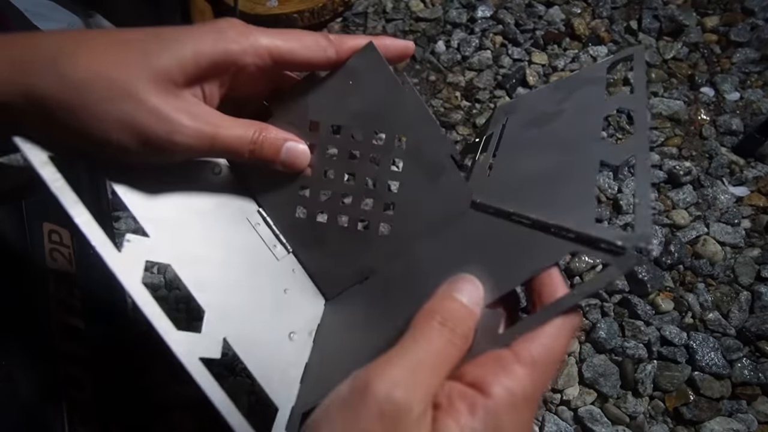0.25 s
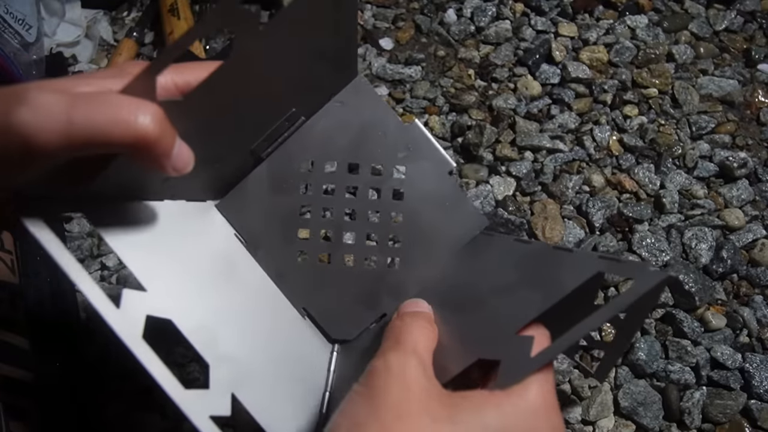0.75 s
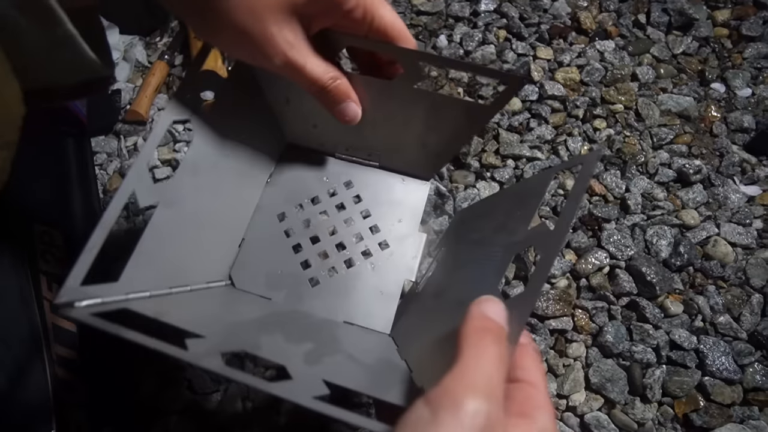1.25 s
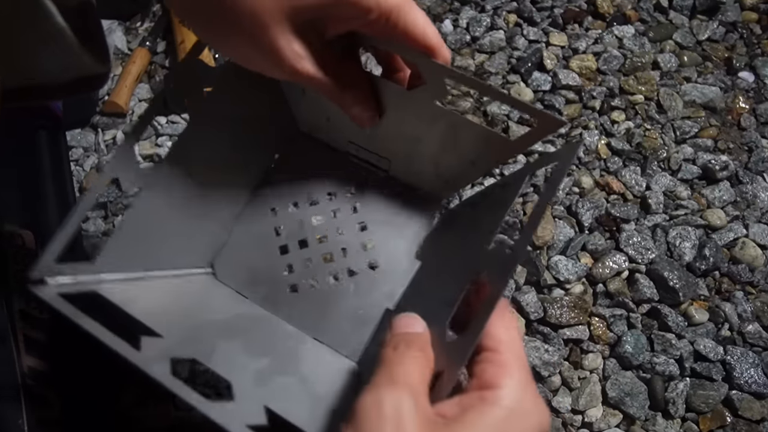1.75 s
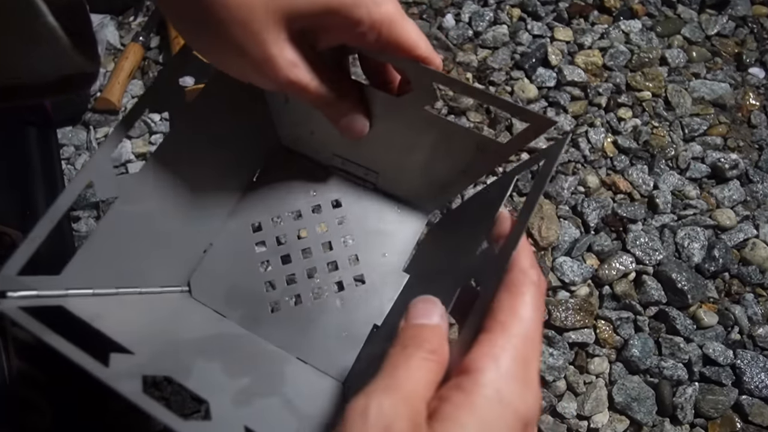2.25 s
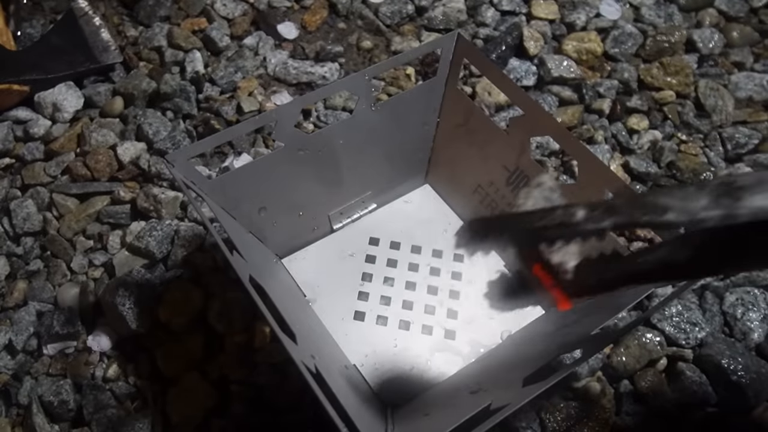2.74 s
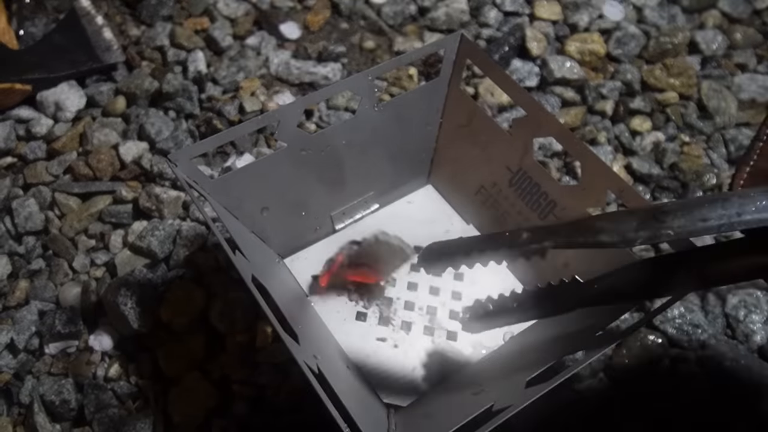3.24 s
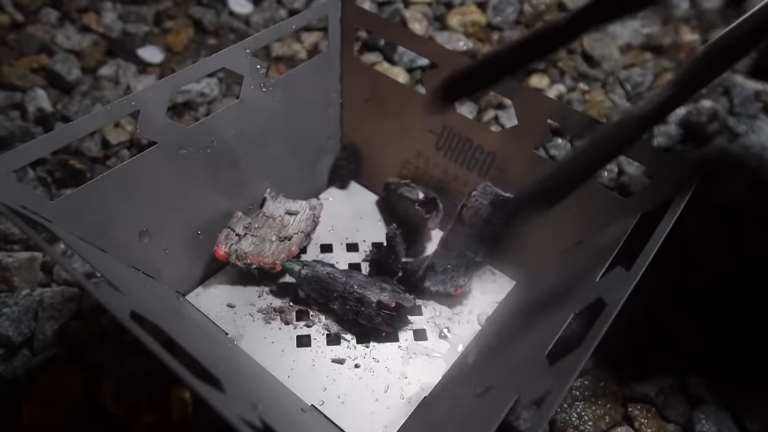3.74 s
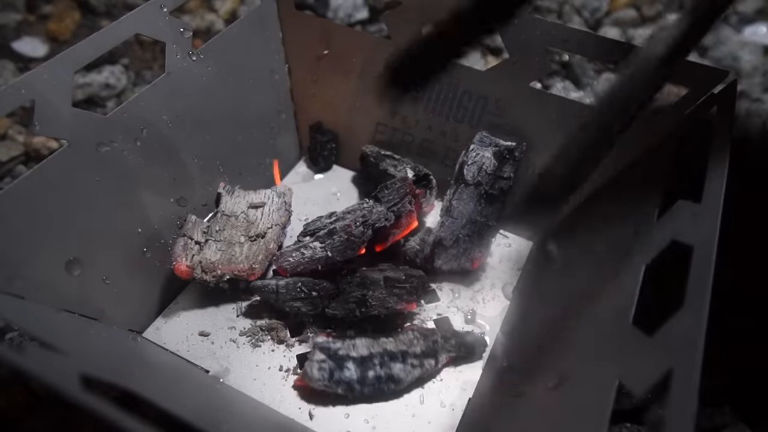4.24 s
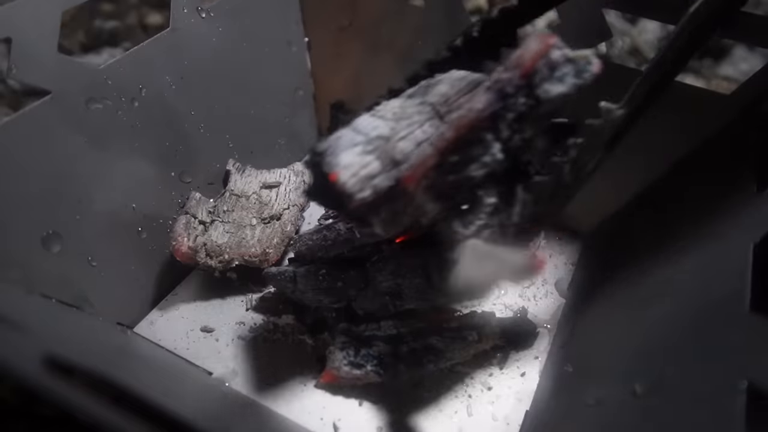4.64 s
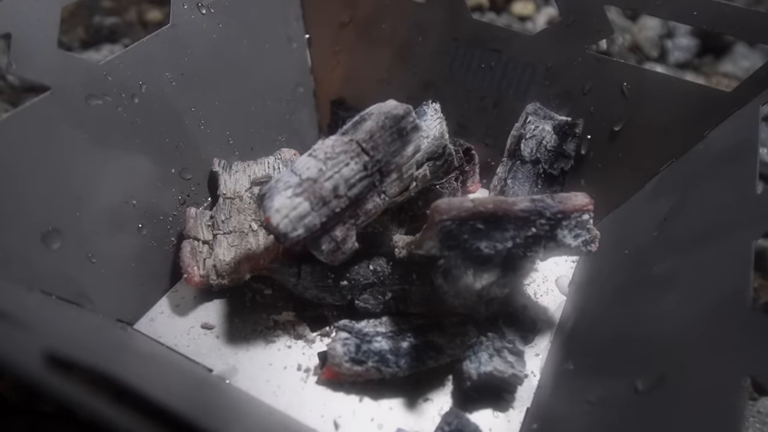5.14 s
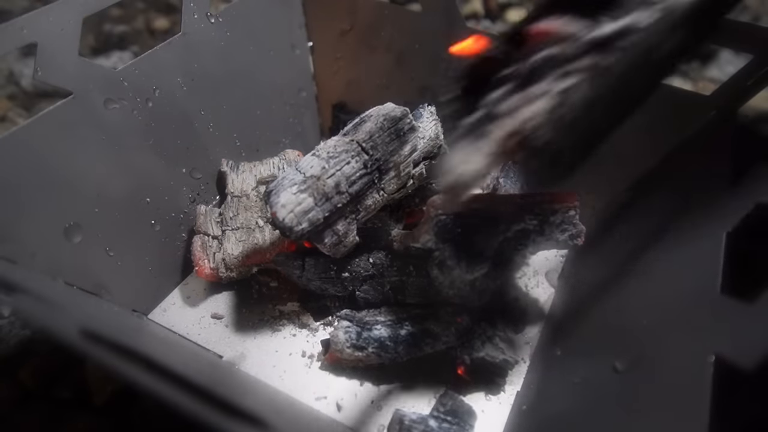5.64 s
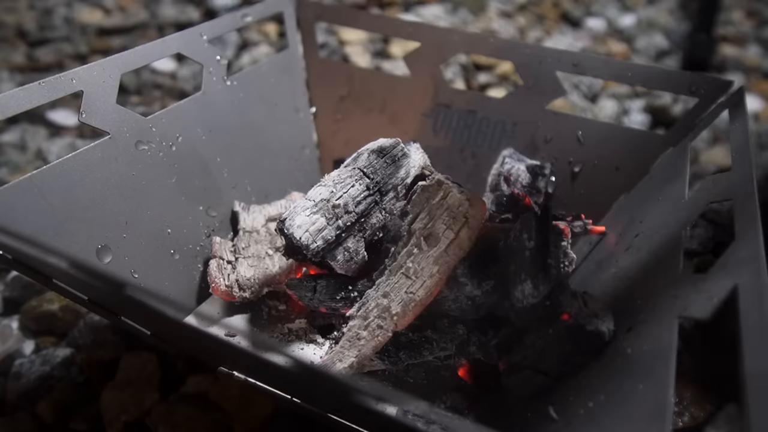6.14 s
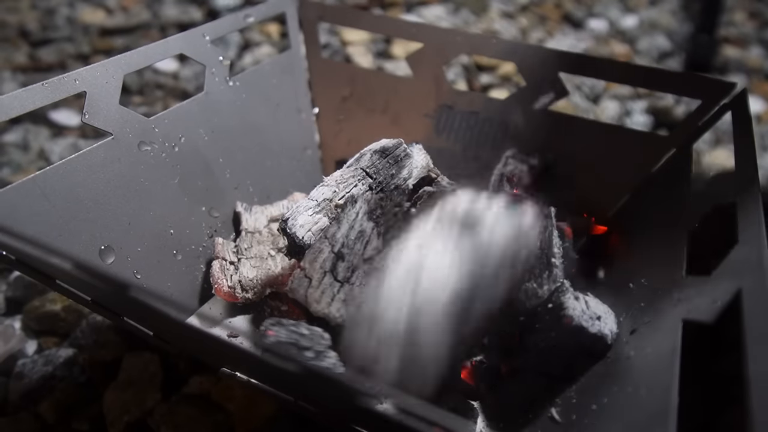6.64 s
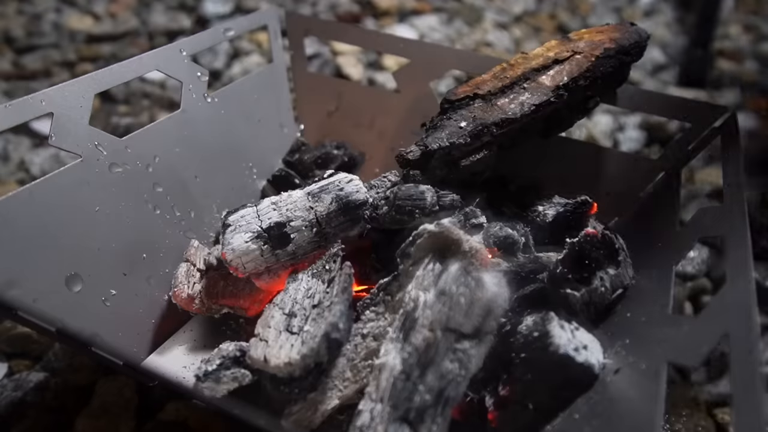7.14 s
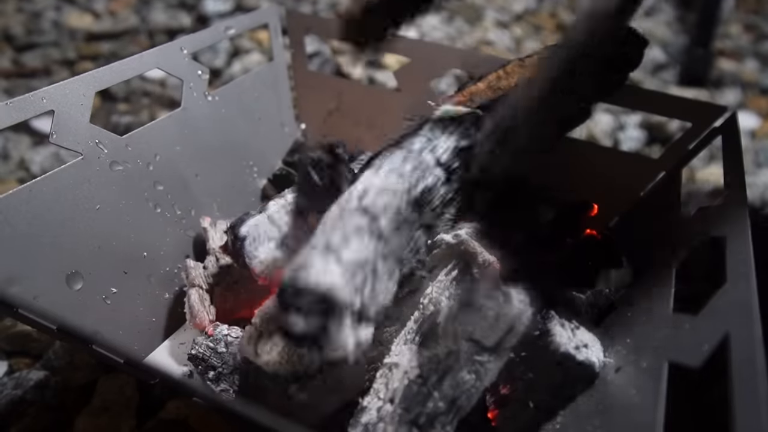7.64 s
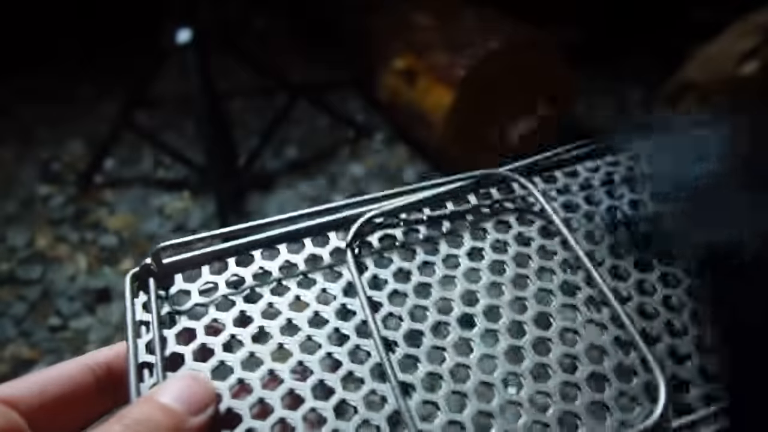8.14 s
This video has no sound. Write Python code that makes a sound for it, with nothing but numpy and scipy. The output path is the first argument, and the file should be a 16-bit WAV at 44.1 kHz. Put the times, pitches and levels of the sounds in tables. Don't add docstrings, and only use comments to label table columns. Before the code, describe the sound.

Rain patters loudly on a tent sheet close overhead while thin steel panels clack open and coals clank into the ringing metal box.

```python
import sys
import numpy as np
from scipy import signal
from scipy.fft import rfft, irfft, next_fast_len
from scipy.io import wavfile
from scipy.ndimage import uniform_filter1d, minimum_filter1d

SR = 44100
rng = np.random.default_rng(int(sys.argv[2]) if len(sys.argv) > 2 else 0)


def invert_db(x):
    u = np.asarray(x, float) / 20
    return 10 ** u


def store_pcm(level_fs):
    pcm = np.round(np.clip(level_fs, -1, 1) * 32767).astype(np.int16)
    wavfile.write(sys.argv[1], SR, np.atleast_2d(pcm).T)


N = 369558
TIME = np.arange(N) / SR

# time in seconds, rain level in dB, treble excess in dB.
SHOWER = [(0, -30, -4), (.9, -26.5, -10), (2.35, -26, -7), (3.02, -25, -13), (3.45, -27.5, -3),
          (3.85, -27.5, -10), (3.91, -23, -3), (4.02, -24.5, -2.5), (4.55, -26, -6), (7.05, -28, -5.5),
          (7.2, -29.5, -5), (8.0, -28.5, -6), (8.1, -22, -4)]
# frequency in Hz, density in dB per Hz.
WATER_COLOUR = [(25, -42), (181, -15), (312, -21), (703, -10), (922, -10), (1310, -4), (2320, -2.5),
                (4450, -1.5), (9510, -12), (15100, -23.5), (16400, -29)]
# frequency in Hz, side minus mid in dB.
WIDTH = [(380, -42), (700, -17), (1290, -17.5), (2380, -10.5), (4400, -7), (8120, -3.5), (15000, -1.5)]
# lower edge in Hz, upper edge in Hz.
SPLASH_BANDS = [
    (250, 1000),
    (1000, 3500),
    (3500, 7500),
    (7500, 16000),
]

# time in seconds, peak in dB, splash excess in dB, dent pitch in Hz.
FAT_DROPS = [(.207, -7.5, -10, 1230), (.544, -5.5, -11.5, 3060), (.563, -2.5, -34, 1560),
             (1.992, -6.5, -10, 1800), (2.143, -8, -8, 810), (0.756, -13, -40, 404),
             (2.86, -3.5, -14.5, 2330), (3.457, -5, -9, 980), (4.011, -7.5, -36, 1470),
             (4.336, -4.5, -11, 1150), (4.481, -3, -5.5, 1930), (2.157, -4.5, -18, 2680),
             (5.342, -1, -22.5, 2160), (7.356, -17, -3.5, 1350), (5.463, -4, -15, 1310),
             (5.484, -4.5, -13, 645), (5.716, -11, -11, 2670), (5.987, -7, -32, 1450),
             (6.028, 0, -13, 1180), (6.356, -2.5, -21, 1940), (6.402, -1, -14, 1220),
             (6.77, -4, -9.5, 1540), (6.806, -5, -16, 1560), (6.885, -6, -6.5, 2880),
             (7.124, -9.5, -7.5, 1330), (7.752, -6, -11.5, 2720), (7.811, -12.5, -8, 725),
             (7.894, -6.5, -10.5, 1980), (8.308, -7, -10, 1440)]
THIN_DROPS = [(0.058, -1, -15, 2880), (0.104, 13.5, -29, 1680), (0.58, 13.5, -28, 1770),
              (.724, 2, -14, 1860), (8.29, -7.5, -21, 1790), (1.253, -6, -6, 3000), (1.414, 1, -13.5, 2370),
              (1.511, -7.5, -17, 1330), (1.641, -3, -16, 2590), (1.692, 1, -15, 3430),
              (1.901, -7, -17, 1880), (1.94, 1, -22, 1990), (2.045, 8, -20, 3800), (3.071, 4, -7, 1690),
              (4.06, 2.5, -28, 4430), (4.374, 9, -14, 1600), (4.417, 11, -17, 3150),
              (4.624, 2, -21.5, 1290), (4.688, -3.5, -10, 1280), (4.829, -1.5, -11, 1780),
              (4.913, -1, -15.5, 3160), (5.661, -5.5, -11.5, 2520), (5.746, 3, -9.5, 1430),
              (6.077, -4.5, -11.5, 1790), (6.216, -2.5, -19, 1400), (6.51, -5, -14, 2850),
              (6.85, 6, -24, 2200), (6.937, -2.5, -15, 910)]
CRACKS = [(0.168, -5, -17, 1610), (0.348, -0.5, -22, 2610), (0.629, 1, -39, 1620), (0.689, -13, -25, 1680),
          (1.142, 1, -17, 3400), (1.584, -8.5, -18, 2240), (1.765, -2.5, -24, 2440), (1.878, -2, -23, 2880),
          (2.545, -4, -13.5, 4050), (2.637, -1, -21, 2480), (3.133, 7, -18, 2780), (3.202, -7, -14, 1470),
          (3.483, -2, -22, 1400), (3.508, 10, -41, 1450), (3.533, 24, -24, 1830), (4.03, 13, -15.5, 3020),
          (4.077, 14, -11, 1830), (4.242, 3, -13, 1360), (4.757, 14, -27, 1450), (4.961, 10.5, -11, 3200),
          (5.076, -5, -14.5, 1200), (5.246, -9.5, -14, 2050), (6.004, -5.5, -10, 3770),
          (6.392, -12, -17, 1500), (6.703, 1, 0, 1610), (7.65, -9, -14, 1510), (7.2, -7.5, -11, 3200),
          (7.475, -7.5, 3, 1530), (8.032, -6.5, -19, 1370), (8.266, -7, -13, 3100)]
ROUND_TAPS = [(1.275, -4.5, -13, 1115), (1.531, -10.5, -10, 2170), (2.359, -13, -12, 730),
              (2.443, -8.5, -15, 770), (2.783, -11.5, -13.5, 840), (2.896, -9, -12, 3680),
              (2.958, -12.5, -38, 1110), (3.893, -16, -18, 1440), (4.67, -14, -10, 800),
              (4.812, -6, -13, 737), (5.433, -7, -18, 1240), (5.694, -11, -28, 800),
              (5.909, -5.5, -23, 1690), (6.18, -15.5, -8, 725), (6.265, -14, -6, 1530),
              (6.487, -4.5, -22, 3580), (6.829, -7, -21, 1390), (7.397, -13.5, -7.5, 970),
              (8.05, -13, -23, 1025)]
DRY_TAPS = [(0.123, -8, -13, 1570), (0.738, -0.5, -26, 1450), (0.853, -9, -26, 2540),
            (1.194, -4.5, -30, 1670), (1.222, -8, -13.5, 1370), (1.3, -11, -12, 3000),
            (1.369, -13, -11, 1170), (1.432, 3, -19, 3600), (1.547, -13, -16, 4040), (1.683, 2, -16, 1550),
            (1.706, 1.5, -22, 4570), (1.8, -7, -19, 1730), (2.213, -15, -30, 1300), (2.414, -5, -18, 3440),
            (2.514, -1, -28, 3400), (2.661, -15, -26, 2890), (2.815, -5, -17, 3070), (2.92, -13, -10, 3900),
            (3.043, -16, -22, 2110), (3.105, -3, -21, 1810), (3.303, -17, -2, 4300), (3.446, -9, -21, 2910),
            (3.524, -3, -5, 3400), (3.738, 6, -18, 1540), (3.801, -13.5, -17, 1310),
            (3.867, -12, -16, 1790), (3.918, -9, -10, 4540), (3.969, -9.5, -8, 1725),
            (3.985, -12, -24, 1150)]
LATER_DRY_TAPS = [(4.212, 6, -16, 1790), (4.352, -0.5, -16, 2050), (4.46, -4.5, -15, 2600),
                  (4.507, -4.5, -17, 1520), (4.605, -12, -7, 4700), (4.736, -11.5, -5, 4460),
                  (4.934, -5.5, -20, 1850), (5.095, -9, -13, 1350), (5.271, -12, -17, 2090),
                  (5.303, -7, -25, 2370), (5.405, -17, -1.5, 3920), (5.634, -9, -15, 1900),
                  (5.77, -9, -26, 1340), (5.843, -11, -35, 1010), (5.856, -7.5, -39, 1500),
                  (6.326, -10, -16, 945), (6.461, -5, -13, 1240), (6.526, 0, -25, 2760),
                  (6.539, -1, -8, 2000), (6.55, -8, -17, 1460), (6.651, -7.5, -9, 3350),
                  (6.689, -9, -20, 1350), (6.924, -5.5, -20, 2100), (7.006, -11.5, -11.5, 3950),
                  (7.223, -11, -18, 1330), (8.06, -1, -23, 1490), (8.067, -13, -26, 1480),
                  (8.086, 9, -14, 1500), (8.106, -11, -18, 3470)]
BEAD = (2.283, -24, -2, 5000)
SMALL_THUDS = [.319, .512, 1.728, 2.076, 2.501, 2.675, 3.704, 3.768, 4.078, 4.299, 4.509, 4.756, 5.184,
               5.247, 5.371, 5.524, 6.218, 6.392, 7.046, 7.379]
SMALL_TAPS = [1.001, 1.03, 1.058, 1.95, 2.086, 2.24, 2.265, 2.68, 2.732, 3.016, 3.896, 5.498, 7.03, 7.365]
SMALL_TICKS = [1.094, 3.052, 3.938, 4.089, 4.125, 4.199, 4.319, 5.149, 5.204, 5.473, 5.574, 5.881, 6.692,
               6.82, 7.599, 7.648]
# peak in dB, splash excess in dB, dent pitch in Hz.
SMALL_SIZES = [
    (-20, -7.5, 614),
    (-11.5, -17, 2470),
    (-22, -1, 4000),
]
THUD_DB = [
    -9,
    -17.5,
    -36,
    -10,
    -20.5,
    -20.5,
    -3.5,
    -19.5,
    -26,
]
SPRAY_DB = [
    -1,
    4.5,
    23,
]

# time in seconds, force in dB, rattle T60 in seconds, grittiness in dB.
HAND_JOLTS = [(.107, -14, 0.098, -29), (.118, -20, 0.084, -12), (0.131, -24, 0.018, 12),
              (0.146, -28.5, 0.026, 11), (.175, -16.5, 0.089, -14), (0.359, -14.5, 0.069, 7.5),
              (0.501, -27, 0.26, -5), (0.585, -2, 0.038, -2), (0.636, -11, 0.028, -6),
              (0.695, -16, 0.098, -1), (1.143, -18, 0.3, -2), (1.257, -15.5, 0.089, 11),
              (1.301, -20.5, 0.13, 10.5), (1.435, -19, 0.064, -3), (1.646, -23, 0.029, -1),
              (1.699, -13, 0.055, 5.5), (8.034, -22, 0.14, 2), (8.068, -24, 0.22, 3)]
COAL_JOLTS = [(3.075, -29, 0.35, -3), (3.132, -13.5, 0.13, 7), (3.201, -13.5, 0.19, -0.5),
              (3.312, -11, 0.037, -6.5), (3.532, -4.5, 0.19, 5), (3.578, -7, 0.57, -11.5),
              (3.745, -21.5, 0.12, 4), (4.092, 0.5, 0.11, -5), (4.171, -13.5, 0.12, -8),
              (4.247, -13.5, 0.15, 3), (4.759, -22, 0.2, 18), (4.85, -26.5, 0.7, -1),
              (5.747, -18, 0.17, -25), (5.853, -23.5, 0.15, -20), (6.469, -31, 0.33, -6),
              (6.542, -19, 0.21, -4), (6.71, -21.5, 0.12, -12), (7.479, -18, 0.088, 2.5),
              (7.524, -28, 0.072, 10), ]
# time in seconds, level in dB.
BLOWS = [(0.104, -24), (0.1304, -12), (0.353, -16), (1.145, -18), (1.254, -6), (0.6888, -18), (1.697, -9),
         (3.131, 0.5), (3.199, -4), (3.5328, 2), (4.0827, -1.5), (4.244, -1), (4.7553, -5), (4.8276, -15),
         (5.7452, 13.5), (6.533, 4.5), (6.706, 9.5), (7.478, 2)]
# start in seconds, end in seconds.
FOLDS = [
    (.095, .2),
    (.49, .78),
    (1.42, 1.46),
    (1.63, 1.74),
]
# frequency in Hz, width in Hz, level in dB.
PANELS = [(800, 10, -18.5), (1750, 110, 1), (3170, 210, -4), (3830, 100, -7.5), (4250, 140, -6.5),
          (4550, 72, -12)]
FOLD_PITCH = [
    .91,
    .98,
    .98,
    1.02,
]
# start in seconds, end in seconds.
SWINGS = [
    (.34, .45),
    (1.13, 1.25),
    (1.248, 1.35),
]
# frequency in Hz, level in dB, T60 in seconds.
HINGE = [(400, -19, .3), (1696, -5, .15), (2632, -2, .4), (3176, -3, .07), (3365, -5, .3), (4290, -8, .35),
         (4926, -6, .25), (5927, -7, .17), (6850, -9, .1)]
LATCH = [(1087, -11, .3), (1809, -9, .4), (1938, -4, .13), (3354, -10, .2), (4657, -4, .15)]
CORNER = [(2751, -8, .07), (2945, -10, .2), (3278, -4, .07), (4683, -13, .1)]

# time in seconds, level in dB.
HUM = [
    (2.3, -95),
    (2.45, -67),
    (3.0, -63),
    (3.4, -73),
    (3.5, -98),
]
# time in seconds, level in dB.
SPLICES = [(2.349, -25), (3.88, -25), (4.591, -19), (5.337, -14), (6.148, -20), (7.098, -20)]

# start in seconds, end in seconds.
TUMBLES = [
    (3.066, 3.2),
    (3.192, 3.37),
    (3.5, 3.9),
    (4.06, 4.246),
    (4.238, 4.4),
    (4.73, 5.0),
]
BOX_HZ = [540, 650, 793, 1225, 1255, 1361, 1374, 1418, 1438, 1495, 1678, 1813, 1840, 2140, 2364, 2740, 2806,
          2945, 3450, 3527, 4446]
BOX_T60 = [0.71, 0.17, .4, 0.47, 0.56, 0.8, 0.16, 0.16, 0.22, 0.4, 0.58, 0.18, 0.26, 0.45, 0.58, 0.53, 0.16,
           0.35, 0.37, 0.25, 0.17]
BOX_DB = [(-24, -28, -21, -44, -27, -29), (-32, -39, -24, -41, -21, -12),
          (-13.5, -21, -19.5, -35, -31, -23), (-16, -8, -21, -18, -4, -5), (-8, -8, -4, -22, -8, -17),
          (-5, -5, -6, -21, -13, -7), (-11, -14, -23, 1.5, 5.5, 3), (-7, 6, -10, -21, -13, 7),
          (-7, -11, -21, -4, 6, -16), (-10, -13, -3, -12, -18, -1), (-5, -1.5, -3, -6, -13, 2),
          (-11, -14, -2, 2, -10, 0), (-12, -12, -15, -2, -15, 2.5), (-4, -8, -11, -14, -18, -15),
          (-15, -17, -3, -11, -19, -16), (-12, -18, -12, -6, -5, -6), (-0.5, -12, 1.5, -3, -13, -15),
          (-11, -20, -8, -11, -5, 1), (-11, -26, -20, -14, -18, -7), (-5, -23, -8, -13, -12, 8.5),
          (-11, -18, -22, -10.5, -2, -17)]
FREEDOM = [
    1.0,
    0.94,
    0.79,
    0.9,
    0.52,
    0.48,
]
# start in seconds, end in seconds.
SETTLES = [
    (5.73, 5.98),
    (6.43, 6.8),
    (7.46, 7.68),
]
# frequency in Hz, width in Hz, level in dB for each of three landings.
FULL_BOX = [(910, 13, -14, -9, -8), (1370, 43, 3, 0.5, 3), (1510, 33, 5, 8, 7.5), (1680, 29, -6, -14, -6),
            (1854, 40, 4.5, -5, 0), (2090, 130, 2.5, 4.5, 5.5), (2585, 120, -0.5, 4.5, 1.5),
            (2990, 31, -6, 3, -4), (5870, 70, -25, -25, -3)]
# start in seconds, end in seconds.
LIFTS = [
    (8.02, 8.39),
]
# frequency in Hz, width in Hz, level in dB.
GRILL = [(1020, 100, 0), (1530, 380, 6), (1900, 160, 3), (3370, 340, 2)]


def unit(x):
    return x / np.sqrt(np.mean(x ** 2))


def band_pass(x, edges_hz):
    return signal.sosfilt(signal.butter(2, edges_hz, "bandpass", fs=SR, output="sos"), x)


def high_pass(x, hz):
    return signal.sosfilt(signal.butter(2, hz, "highpass", fs=SR, output="sos"), x)


def colour(x, points):
    hz, db = np.transpose(points)
    size = next_fast_len(N)
    log_hz = np.log(np.arange(size // 2 + 1) * SR / size + 1)
    gain = invert_db(np.interp(log_hz, np.log(hz + 1), db))
    return irfft(rfft(x, size) * gain, size)[..., :N]


def fade(x, tau_s):
    return signal.lfilter([1], [1, -np.exp(-1 / (tau_s * SR))], x)


def train(times, sizes):
    return np.bincount(np.clip((times * SR).astype(int), 0, N - 1), sizes, N)


def grit(shape, spread_db):
    return unit(rng.standard_normal(shape) * invert_db(spread_db * rng.exponential(size=shape[-1])))


def walk(rate):
    k = int(SR / rate)
    steps = np.repeat(rng.standard_normal(N // k + 1), k)
    return uniform_filter1d(uniform_filter1d(steps, k), k)[:N]


def far_wash():
    s, _, treble_db = np.transpose(SHOWER)
    treble_excess = np.interp(TIME, s, treble_db)
    wash = 0
    for low_hz, high_hz, share in ((20, 400, 0), (400, 2500, 0), (2500, 17000, 1)):
        gain = invert_db(share * treble_excess + 2.2 * walk(25))
        wash = wash + gain * band_pass(rng.standard_normal((2, N)), [low_hz, high_hz])
    return unit(colour(wash, WATER_COLOUR))


def breaking_water():
    water = colour(grit((2, N), 1.86), WATER_COLOUR)
    bands = []
    for edges in SPLASH_BANDS:
        band = band_pass(water, edges)
        bands.append((edges, band / np.sqrt(uniform_filter1d(band ** 2, size=440) + 1e-18)))
    return bands


def slaps(water, times, band_db, lean, rise_s, taus_s, tail_db, tail_s):
    out = 0
    for (edges, band), db, tau in zip(water, band_db, taus_s):
        impacts = np.array([train(times, invert_db(db)), train(times, invert_db(db) * lean)])
        hits = fade(impacts, rise_s) / (rise_s * SR)
        burst = fade(fade(hits, rise_s), tau) / (rise_s * SR)
        swell = burst + invert_db(tail_db) * fade(hits, tail_s)
        out = out + band_pass(swell[[0, 0, 1]] * band[[0, 1, 0]], edges)
    return out


def plops(times, hz, db, lean, cycles):
    offsets = np.arange(700)
    turns = hz[:, None] * offsets / SR
    swell = np.sqrt(turns / cycles) * np.exp(1 - turns / cycles)
    grains = high_pass(invert_db(db)[:, None] * np.sin(2 * np.pi * turns) * swell, 220)
    where = np.clip((times * SR).astype(int)[:, None] + offsets, 0, N - 1).ravel()
    mid = np.bincount(where, grains.ravel(), N)
    leaning = np.bincount(where, (grains * lean[:, None]).ravel(), N)
    return np.array([mid, 0 * TIME, leaning])


def patter(water):
    count = 1600
    when = rng.random(count) * N / SR
    lean = rng.uniform(-1.4, 1, count)
    size = rng.exponential(size=count)
    tones = rng.standard_normal((4, count))
    dent_hz = 650 * 6 ** rng.random(count)
    band_db = np.minimum(3.7 * size + 3.8 * tones, 8.5) + np.array([[-12], [-5.5], [-8.5], [-12]])
    out = slaps(water, when, band_db, 0.3 * lean, 0.0005, (0.0022, 0.0015, 0.001, 0.0008), -21, 0.012)
    return out + plops(when, dent_hz, band_db[1] + 0.078, 0.17 * lean, 0.51)


def loud_drops(water):
    kinds = [FAT_DROPS, THIN_DROPS, CRACKS, ROUND_TAPS, DRY_TAPS, LATER_DRY_TAPS]
    for peaks_s, size in zip((SMALL_THUDS, SMALL_TAPS, SMALL_TICKS), SMALL_SIZES):
        kinds.append([(peak_s - 0.002, *size) for peak_s in peaks_s])
    s, peak_db, splash_db, dent_hz = np.transpose(sum(kinds, []) + [BEAD])
    thud_db = np.append(np.repeat(THUD_DB, [len(kind) for kind in kinds]), THUD_DB[-1])
    spray_db = np.repeat(SPRAY_DB, [len(s) - len(SMALL_TICKS) - 1, len(SMALL_TICKS), 1])
    spray_chance, side_chance = rng.standard_normal((2, len(s)))
    lean = 0.13 * side_chance
    band_db = peak_db + np.array([
        thud_db + 2.5,
        0 * s - 7.5,
        splash_db + 7.0,
        splash_db + spray_db + 3.6 * spray_chance])
    out = plops(s, dent_hz, peak_db - 12.0, lean, 3.0)
    return out + slaps(water, s - 0.001, band_db, lean, 0.0006, (0.0024, 0.0017, 0.001, 0.0008), -18, 0.011)


def rain():
    water = breaking_water()
    s, rain_db, _ = np.transpose(SHOWER)
    wash = np.array([*far_wash(), 0 * TIME])
    shower = invert_db(np.interp(TIME, s, rain_db)) * (patter(water) + invert_db(-2.5) * wash)
    return high_pass(shower + loud_drops(water), 120)


def rattle(t):
    build_up_db_per_s = 1300
    tremble = invert_db(-39.5)
    s, force_db, t60, grit_db = np.transpose(HAND_JOLTS + COAL_JOLTS)[:, :, None]
    before_db = build_up_db_per_s * (s - t)
    after_db = 60 * (t - s) / np.maximum(t60, 0.01)
    jolts = invert_db(force_db - np.where(t < s, before_db, after_db))
    return jolts.sum(axis=0) + tremble, (jolts * invert_db(grit_db)).sum(axis=0) + tremble


def resonate(x, hz, t60_s):
    r = np.exp(-np.log(1000) / (max(t60_s, 0.01) * SR))
    w = 2 * np.pi * hz / SR
    return signal.lfilter([1, 0, -1], [1, -2 * r * np.cos(w), r * r], x)


def steel(spans, mode_sets, spread_db, blow_db, crunch_db, crunch_hz):
    hard_hz = 2600
    out = np.zeros((3, N))
    blow_s, blows = np.transpose(BLOWS)
    struck = np.array([train(blow_s, invert_db(blows + blow_db)), 0 * TIME])
    for (start_s, end_s), modes in zip(spans, mode_sets):
        a, b = int(start_s * SR), min(int(end_s * SR), N)
        t = TIME[a:b]
        push, gritty = np.array(rattle(t))[:, None] * grit((2, b - a), spread_db)
        ring = 0
        for hz, db, t60 in modes:
            blow = np.roll(struck[:, a:b], rng.integers(70), axis=1)
            contact = gritty if hz > hard_hz else push
            ring = ring + unit(resonate(contact + blow, hz, t60)) * np.std(push) * invert_db(db - 2.5)
        crunch_bands = ([crunch_hz[0], 2000], [2000, crunch_hz[1]])
        for drive, edges, db in zip((push, gritty), crunch_bands, crunch_db):
            ring = ring + invert_db(db) * np.std(drive) * unit(band_pass(drive, edges))
        out[:2, a:b] += ring * np.clip(np.minimum(t - t[0], (t[-1] - t) / 3) / 0.0053, 0, 1)
    return out


def rings(peaks, damping):
    return [(hz, db, np.log(1000) / (np.pi * width * damping)) for hz, width, db in peaks]


def folding_panels():
    modes = [rings(np.multiply(PANELS, [bend, 1, 1]), 0.68) for bend in FOLD_PITCH]
    return steel(FOLDS, modes, 1.9, 19.0, (-5, -1.6), (1200, 7000))


def swinging_panels():
    return steel(SWINGS, [HINGE, LATCH, CORNER], 0.88, 35.0, (-8, -7), (1200, 7500))


def far_engine():
    hum = unit(band_pass(rng.standard_normal(N), [62, 80]))
    return hum * invert_db(np.interp(TIME, *np.transpose(HUM)))


def scene_bumps():
    s, db = np.transpose(SPLICES)
    return fade(train(s, invert_db(db - 9.5)), 0.001)


def crowd():
    pitch, size = rng.random((2, 26))
    return list(zip(1150 * 4.5 ** pitch, -15 - 6 * pitch + 10 * size - 5, 0.34 * (0.5 + size)))


def tumbling_coals():
    modes = []
    for db, free in zip(np.transpose(BOX_DB), FREEDOM):
        modes.append(list(zip(BOX_HZ, db, np.multiply(BOX_T60, free))) + crowd())
    return steel(TUMBLES, modes, 2.6, 29.0, (-9, -4), (1150, 5500))


def settling_coals():
    modes = []
    for landing in range(len(SETTLES)):
        modes.append(rings([(row[0], row[1], row[2 + landing]) for row in FULL_BOX], 1.26))
    return steel(SETTLES, modes, 2.62, 3.1, (-4, -1.5), (1100, 6500))


def lifted_grill():
    return steel(LIFTS, [rings(GRILL, 0.81)], 4.06, 0, (-1.4, -0.7), (650, 7000))


def scene():
    mid, side, lean = (rain() + folding_panels() + swinging_panels() + tumbling_coals()
                       + settling_coals() + lifted_grill())
    side = colour(side, WIDTH) + lean
    stereo = np.array([invert_db(-1.0) * (mid + side), invert_db(-0.9) * (mid - side)])
    return stereo + far_engine() + scene_bumps()


def low_pass(x):
    return signal.sosfilt(signal.butter(12, 16510, fs=SR, output="sos"), x)


def record(dry):
    room_left = np.minimum(0.97 / (np.abs(dry).max(axis=0) + 1e-9), 1)
    gain = uniform_filter1d(minimum_filter1d(room_left, size=441), size=441)
    return low_pass(np.clip(dry * gain, -1, 1))


dry = scene()
out = record(dry)
store_pcm(out)
```